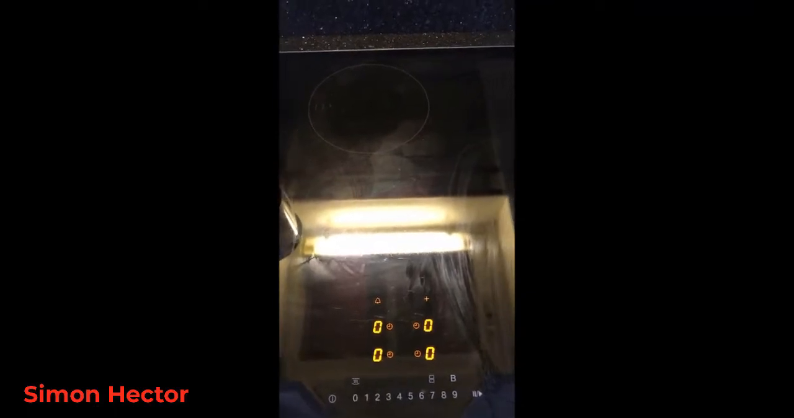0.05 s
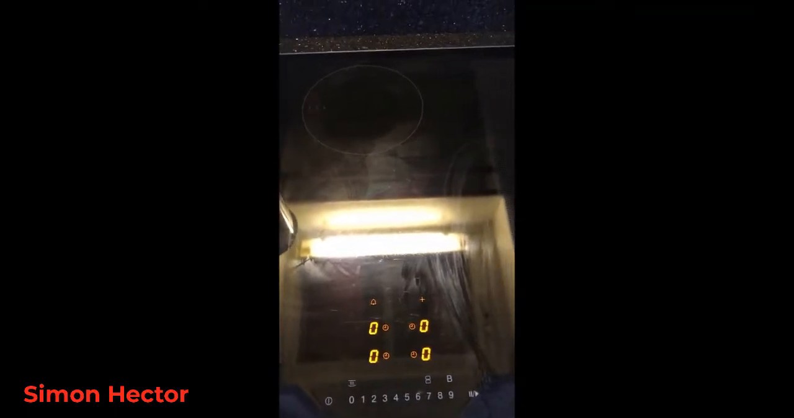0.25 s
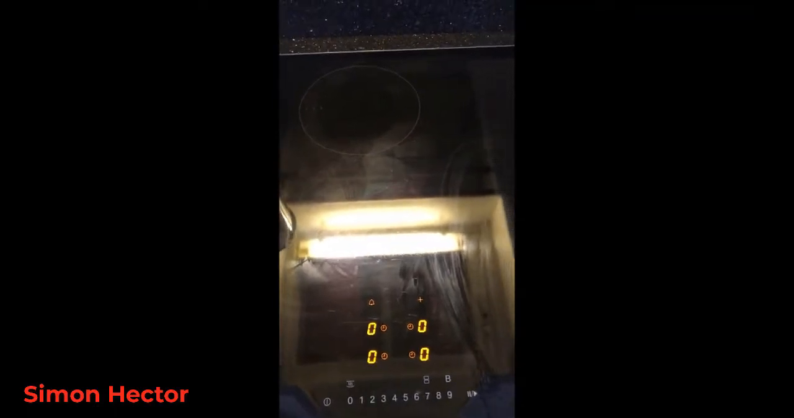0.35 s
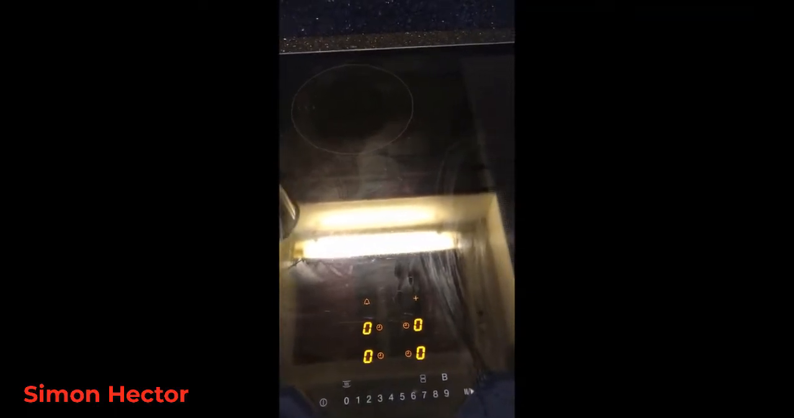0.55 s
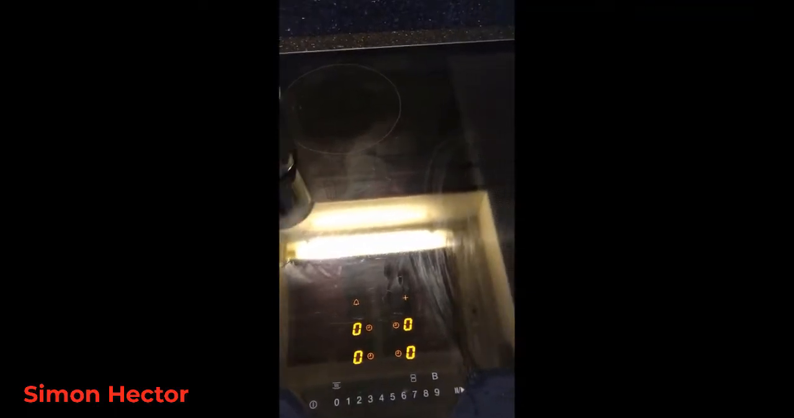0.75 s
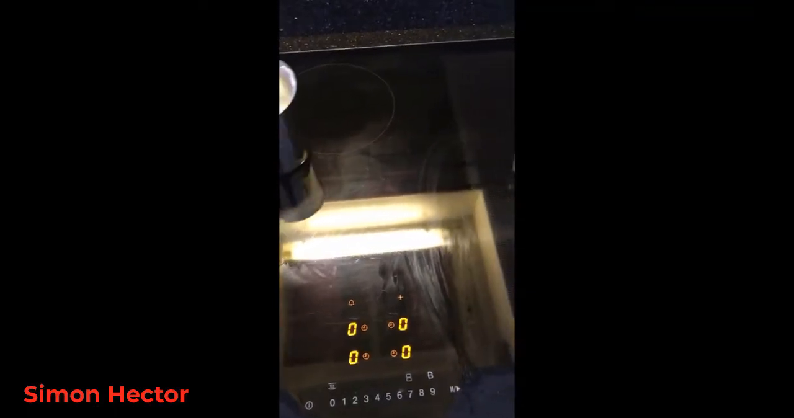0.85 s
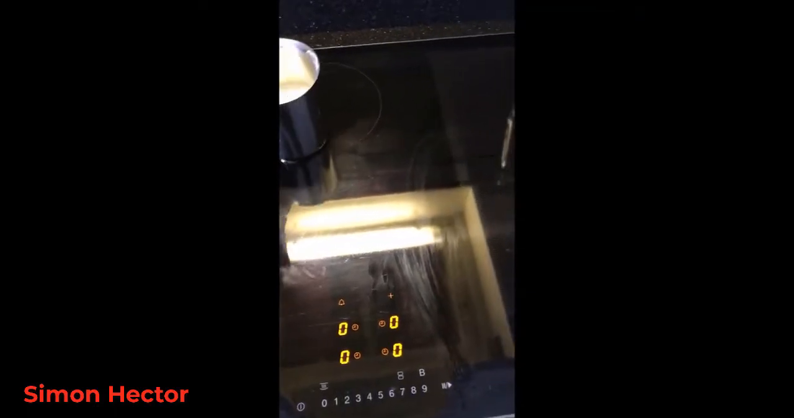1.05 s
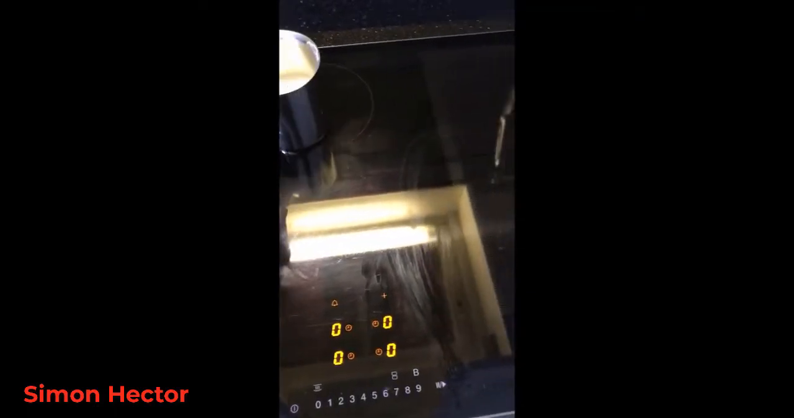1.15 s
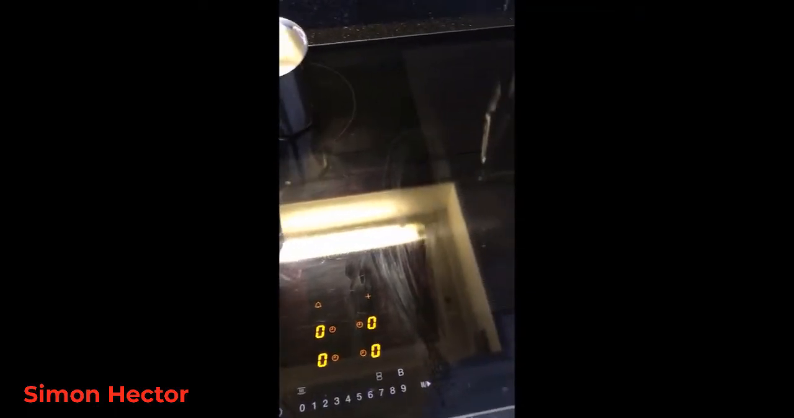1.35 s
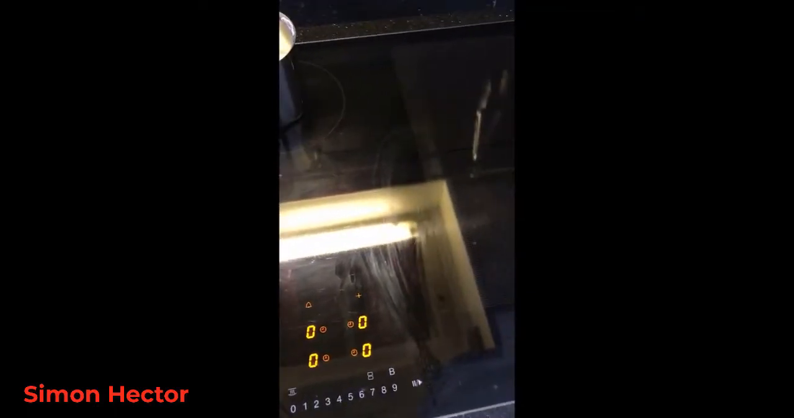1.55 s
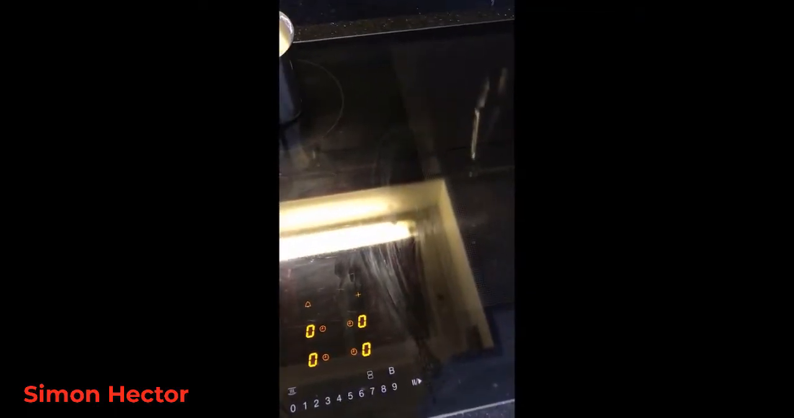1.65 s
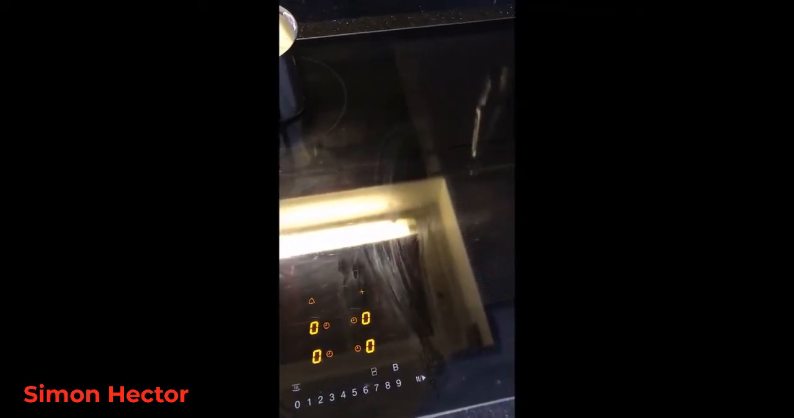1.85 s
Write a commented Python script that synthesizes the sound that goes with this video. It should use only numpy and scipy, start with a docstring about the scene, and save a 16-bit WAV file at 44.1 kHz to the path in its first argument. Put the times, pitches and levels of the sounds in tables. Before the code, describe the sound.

A low thud with a slight tick comes at 0.2 seconds as an object is set on a nearby kitchen worktop, settling with two smaller knocks. From 0.6 seconds a soft rubbing hiss and dull rustle swell, with a faint squeak and a light bump near 0.75. Short brushes follow between 1.0 and 1.3. The rustle fades by about 1.7, leaving quiet room rumble and faint electrical hum.

```python
"""A quiet kitchen, one microphone near a glass hob. Something is set down beside it: each contact
ticks, knocks and sets the worktop booming, then the object settles once more. A soft rubbing swell
follows, like a hand or sleeve sliding over it: friction hisses and stirs the object's resonances,
with a faint squeak, a light bump and a few short scuffs and brushes over a dull rustle.
Further back lie the room's low answer to each thud, its rumble and a faint electrical hum."""
import sys
import numpy as np
from scipy import signal
from scipy.fft import rfft, irfft, next_fast_len
from scipy.io import wavfile
from scipy.ndimage import uniform_filter1d, map_coordinates

SR = 44100
rng = np.random.default_rng(int(sys.argv[2]) if len(sys.argv) > 2 else 0)


def bounce(signal):
    """Save signal as a 16-bit WAV file at the path given by the first command-line argument."""
    frames = np.transpose(np.atleast_2d(signal))
    limited = np.clip(frames, -1, 1)
    pcm = np.round(limited * 32767).astype(np.int16)
    wavfile.write(sys.argv[1], SR, pcm)


N = 83790

# Contacts with the worktop. Each row: start in seconds, boom level in dB, boom rise in seconds,
# then knock, puff and tick levels in dB.
CONTACTS = [(0.2079, -26.5, 0.027, -36, -42.5, -51.5), (0.2824, -33.5, 0.03, -47, -61, -69),
            (0.3192, -53, 0.022, -48.5, -63, -67), (0.756, -40, 0.019, -47.5, -53.5, -75)]
# Modes of the knock and the tick. Each row: frequency in Hz, relative level in dB, T60 in seconds.
KNOCK_MODES = [(165, -1.5, 0.063), (225, -2.5, 0.13), (334, -6.5, 0.15), (454, -18, 0.067),
               (562, -17, 0.067), (684, -13, 0.033), (762, -17, 0.11), (945, -18.5, 0.1)]
TICK_MODES = [(3290, -13.5, 0.089), (3980, -4.5, 0.06), (4237, -14, 0.15), (8600, -15, .035),
              (13100, -12, 0.04)]
# Impact noise, bright in the tick, dull in the puff. Each row: frequency in Hz, relative level in dB.
CRACK_SPECTRUM = [(1500, -7), (4000, -4), (5000, 4), (7000, 9), (10000, -1), (15000, 5)]
PUFF_SPECTRUM = [(100, -5), (300, 2.5), (950, -7), (1400, -23), (3000, -34), (8000, -57)]

# Course of the stroke's hiss, ring, rustle and shuffle. Each row: time in seconds, level in dB.
HISS_ENVELOPE = [(0.55, -88), (0.63, -72.5), (0.69, -73.5), (0.73, -64.5), (0.79, -60.5), (0.825, -65),
                 (0.865, -62.5), (0.92, -66.5), (0.975, -65), (0.995, -73), (1.11, -75), (1.24, -74),
                 (1.4, -85)]
RING_ENVELOPE = [(0.55, -85), (0.68, -71), (0.76, -69.5), (0.80, -68.5), (0.83, -67.5), (0.92, -64),
                 (1.0, -65), (1.07, -68.5), (1.15, -71), (1.4, -82.5)]
RUSTLE_ENVELOPE = [(0.55, -73), (0.72, -64), (0.9, -59), (1.0, -59.5), (1.2, -59.5), (1.3, -63.5),
                   (1.42, -70), (1.7, -71.5)]
SHUFFLE_ENVELOPE = [(0.73, -80.5), (0.775, -53), (0.81, -80), (1.0, -68.5), (1.15, -64), (1.3, -63.5),
                    (1.39, -75), (1.48, -60), (1.6, -68), (1.75, -88)]
# Colours of the friction noises. Each row: frequency in Hz, relative level in dB.
HISS_SPECTRUM = [(300, -35), (1500, -13), (2600, -4.5), (4300, -2), (7000, -1), (8000, -6), (9400, -1.5),
                 (10300, -9), (11500, -5.5), (15500, -6)]
BRUSH_SPECTRUM = [(500, -22), (2000, 3.5), (3500, 1), (7200, -0.5), (8200, -7.5), (9500, 1.5), (10500, -10),
                  (12000, -5), (15500, -18)]
RUSTLE_SPECTRUM = [(100, -46), (250, 2), (340, 7.5), (450, -3), (670, 1.5), (790, -6), (920, -3.5),
                   (1200, -2.5), (1500, -12.5), (2300, -17), (4000, -23), (9000, -79)]
SHUFFLE_SPECTRUM = [(120, -26), (230, -5), (330, 12.5), (400, 3.5), (520, -44), (1500, -28)]
# The object's resonances, rubbed and brushed. Each row: centre in Hz, width in Hz, relative level in dB.
RUB_RESONANCES = [(690, 85, 2.5), (915, 110, 1), (1308, 28, 3.5), (1665, 58, -3), (2163, 87, -3.5),
                  (2375, 91, -7), (2985, 65, -2), (3140, 100, -7.5), (3690, 280, -9), (3750, 59, -3),
                  (4160, 160, -13.5), (4430, 42, -10), (7040, 52, -6.5)]
BRUSH_RESONANCES = [(1095, 37, 0.5), (1317, 27, 0.5), (2270, 75, -3), (2375, 31, 2), (3015, 68, -1.5),
                    (3760, 110, -8.5), (3950, 170, -11), (5250, 80, -5.5)]
# Catches in mid-stroke and brushes at its close.
# Each row: start in seconds, length in seconds, hiss level in dB, resonance level in dB.
STROKE_SCUFFS = [(0.78, .012, -74, -61.5), (0.794, 0.014, -91, -56.5), (0.863, .008, -70, -64),
                 (0.898, 0.013, -65, -59)]
CLOSING_BRUSHES = [(1.025, 0.0055, -68, -79), (1.155, 0.015, -58.5, -58.5), (1.255, .016, -65.5, -69.5)]

# The room's answer to a thud, and its own rumble. Each row: frequency in Hz, relative level in dB.
ECHO_SPECTRUM = [(35, -22), (65, 2), (100, 6.5), (140, -5.5), (230, -4), (400, -14.5), (1000, -24),
                 (2000, -36.5), (6000, -48)]
ROOM_SPECTRUM = [(20, -31), (40, -4.5), (62, 2), (90, 1), (115, -9), (140, -1), (175, -9), (230, -8.5),
                 (280, -19), (360, -12), (480, -20), (1000, -20.5), (1600, -28.5), (2500, -32.5),
                 (5000, -36.5), (8500, -40), (10300, -43.5), (12000, -37.5), (15500, -45)]
# Tones of the electrical hum. Each row: frequency in Hz, level in dB.
HUM_TONES = [(202, -66.5), (134.9, -75.5)]

BOOM_HZ, BOOM_SHAPE = 83.8, 1.48  # the worktop's lowest mode
BOOM_TAIL_DB, BOOM_TAIL_HZ, BOOM_TAIL_T60_S = -20.5, 79.86, 0.75  # level relative to the boom
ROUGH_DB, ROUGH_KNOTS_PER_S, HISS_T60_S = 1.62, 210, 0.047
ECHO_DB, ECHO_RISE_S, ECHO_T60_S = -22.5, 0.023, 0.82  # level relative to the boom
ROOM_DB, ROOM_FALL_DB_PER_S = -58, 0.27


def thuds():
    """Each contact ticks, knocks and sets the worktop's lowest mode swelling and dying."""
    out = np.zeros(N)
    for start, boom_db, rise_s, knock_db, puff_db, tick_db in CONTACTS:
        t = since(start)
        rise = t / rise_s
        swell = (rise * np.exp((1 - rise ** 2) / 2)) ** BOOM_SHAPE  # peaks at 1 after rise_s
        boom = -swell * np.sin(2 * np.pi * BOOM_HZ * t)
        linger = amp(BOOM_TAIL_DB) * (1 - np.exp(-rise)) * fade(t, BOOM_TAIL_T60_S)
        tail = linger * np.sin(2 * np.pi * BOOM_TAIL_HZ * t)
        knock = amp(knock_db) * ring(KNOCK_MODES, t)
        puff = amp(puff_db) * fade(t, t60_s=0.063) * noise(PUFF_SPECTRUM)
        crack = amp(-3.5) * fade(t, t60_s=0.053) * noise(CRACK_SPECTRUM)
        tick = amp(tick_db) * (ring(TICK_MODES, t) + crack)
        out += amp(boom_db) * (boom + tail) + knock + puff + tick
    return out


def rubbing():
    """A long stroke that catches a few times: rough hiss plus the resonances of the rubbed object."""
    hiss, body = level(HISS_ENVELOPE), level(RING_ENVELOPE)
    for start, length, hiss_db, body_db in STROKE_SCUFFS:
        hiss += amp(hiss_db) * burst(start, length, HISS_T60_S)
        body += amp(body_db) * burst(start, length, t60_s=0.053)
    grain = amp(ROUGH_DB * wobble(ROUGH_KNOTS_PER_S))
    return grain * hiss * patchy(noise(HISS_SPECTRUM)) + body * resonant(RUB_RESONANCES)


def brushing():
    """Short brushes hiss over the object and leave its resonances lingering faintly."""
    hiss, body = np.zeros(N), np.zeros(N)
    for start, length, hiss_db, body_db in CLOSING_BRUSHES:
        hiss += amp(hiss_db) * burst(start, length, HISS_T60_S)
        tail = amp(-12.5) * burst(start, length, t60_s=1)
        body += amp(body_db) * (burst(start, length, t60_s=0.076) + tail)
    grain = amp(ROUGH_DB * wobble(ROUGH_KNOTS_PER_S))
    return grain * (hiss * patchy(noise(BRUSH_SPECTRUM)) + body * resonant(BRUSH_RESONANCES))


def rustle():
    """The dull rustle and low, hollow shuffle of the movement outlast the hiss."""
    shuffle = level(SHUFFLE_ENVELOPE) * noise(SHUFFLE_SPECTRUM)
    return level(RUSTLE_ENVELOPE) * noise(RUSTLE_SPECTRUM) + shuffle


def squeak(start_s=0.703, hz=2426, db=-63):
    """A brief stick-slip tone as the stroke takes hold."""
    envelope = burst(start_s, length_s=0.0079, t60_s=0.07)
    return amp(db) * envelope * np.sin(2 * np.pi * hz * since(start_s))


def echo():
    """Each thud leaves a dull, diffuse tail in the room."""
    tails = np.zeros(N)
    for start, boom_db, *_ in CONTACTS:
        t = since(start)
        tails += amp(boom_db + ECHO_DB) * (1 - np.exp(-t / ECHO_RISE_S)) * fade(t, ECHO_T60_S)
    return tails * noise(ECHO_SPECTRUM)


def room_tone(waver_db=2.5, drift_rad=0.5):
    """Behind everything, the kitchen's rumble and a slightly wavering electrical hum."""
    t = since(0)
    hum = np.zeros(N)
    for hz, db in HUM_TONES:
        peak = np.sqrt(2) * amp(db + waver_db * wobble(4.79))
        hum += peak * np.sin(2 * np.pi * hz * t + drift_rad * wobble(4.9))
    return hum + amp(ROOM_DB - ROOM_FALL_DB_PER_S * t) * noise(ROOM_SPECTRUM)


def amp(db):
    """Decibels to gain."""
    return 10 ** (np.asarray(db) / 20)


def unit(x):
    """Scale to rms 1."""
    return x / np.sqrt(np.mean(x ** 2) + 1e-20)


def since(start_s):
    """Seconds after the start, zero before."""
    return np.maximum(np.arange(N) / SR - start_s, 0)


def level(envelope):
    """Gain per sample from points of seconds and dB."""
    return amp(np.interp(since(0), *np.transpose(envelope)))


def fade(t, t60_s):
    """Exponential decay from the moment t turns positive, 60 dB down after t60_s."""
    return (t > 0) * np.exp(-np.log(1000) * t / t60_s)


def burst(start_s, length_s, t60_s, attack_s=0.0012):
    """Envelope of a short rub: attack, hold, release."""
    attack = np.minimum(since(start_s) / attack_s, 1)
    return attack * np.exp(-np.log(1000) * since(start_s + length_s) / t60_s)


def wobble(knots_per_s):
    """A smooth random curve."""
    return map_coordinates(rng.standard_normal(4096), [since(0) * knots_per_s], mode="wrap")


def ring(modes, t):
    """Damped modes, alternating in sign."""
    return sum((-1) ** k * amp(db) * fade(t, t60_s) * np.sin(2 * np.pi * hz * t)
               for k, (hz, db, t60_s) in enumerate(modes))


def filtered(x, response):
    """Shape x by a gain that depends on frequency."""
    size = next_fast_len(N + SR // 2)
    return irfft(rfft(x, size) * response(np.fft.rfftfreq(size, 1 / SR)), size)[:N]


def noise(spectrum):
    """Noise of rms 1 coloured by points of Hz and dB."""
    hz, db = np.transpose(spectrum)
    colour = lambda f: amp(np.interp(np.log(f + 1), np.log(hz), db))
    return unit(filtered(rng.standard_normal(N), colour))


def resonant(peaks):
    """Noise through steep resonances, scaled to rms 1."""
    body = lambda f: sum(amp(db) / (1 + (2 * (f - hz) / width) ** 2) for hz, width, db in peaks)
    return unit(filtered(rng.standard_normal(N), body))


def patchy(x, depth_db=3.5):
    """Random patches of gain over time and frequency, as the contact shifts."""
    spectra = signal.stft(x, nperseg=1024)[2]
    patches = uniform_filter1d(rng.standard_normal(spectra.shape), size=4, axis=0)  # across frequency
    patches = uniform_filter1d(patches, size=6, axis=1)  # across time
    spectra *= amp(depth_db * unit(patches))
    return unit(signal.istft(spectra, nperseg=1024)[1][:N])


def scene():
    """The object and the room behind it, at one microphone."""
    return (thuds() + rubbing() + brushing() + rustle() + squeak() + echo() + room_tone())[None]


def record(dry, top_hz=15650):
    """The recorder keeps nothing above its band limit."""
    return filtered(dry[0], lambda hz: hz < top_hz)[None]


dry = scene()
out = record(dry)
bounce(out)
```